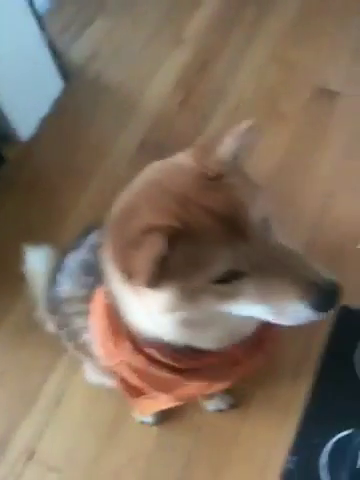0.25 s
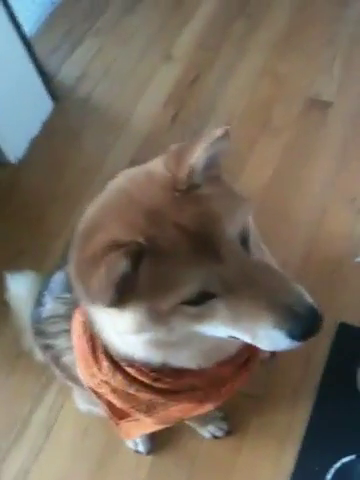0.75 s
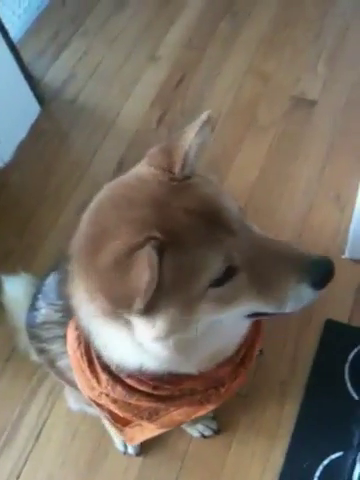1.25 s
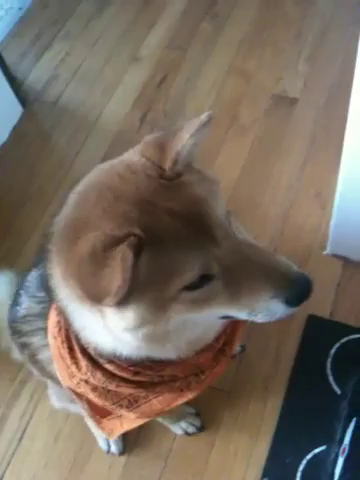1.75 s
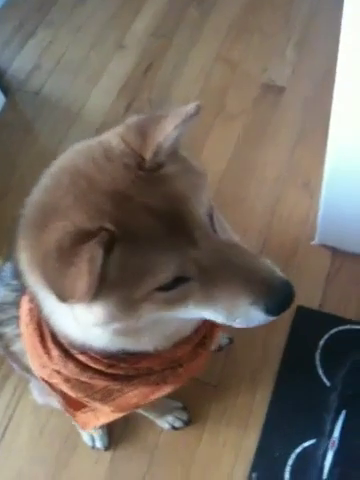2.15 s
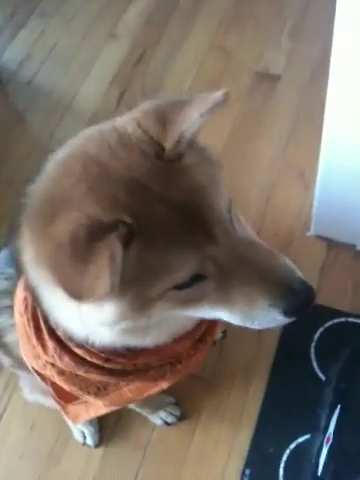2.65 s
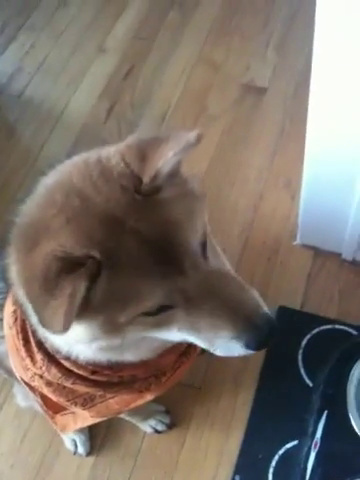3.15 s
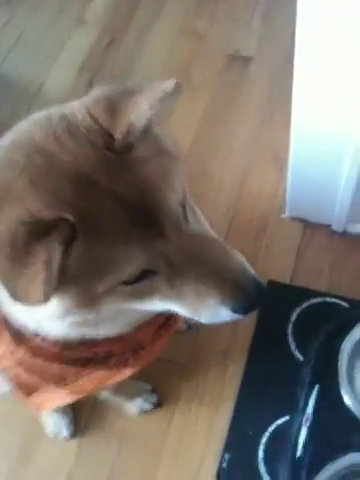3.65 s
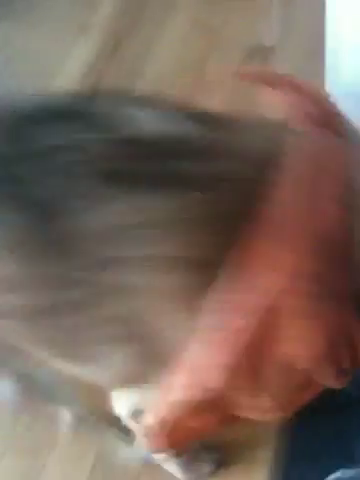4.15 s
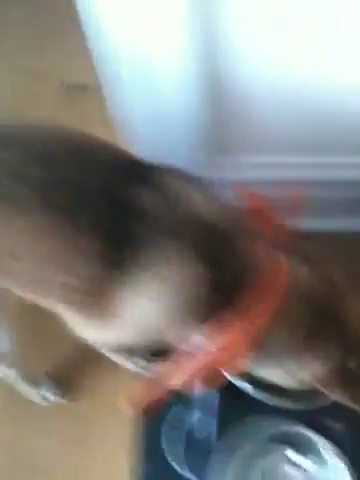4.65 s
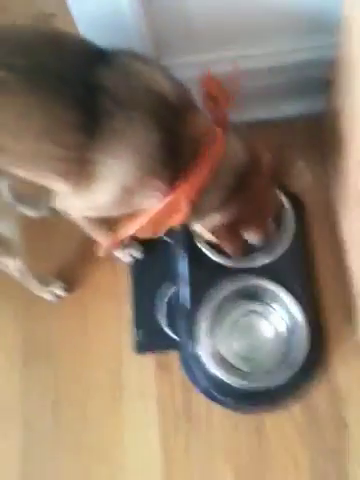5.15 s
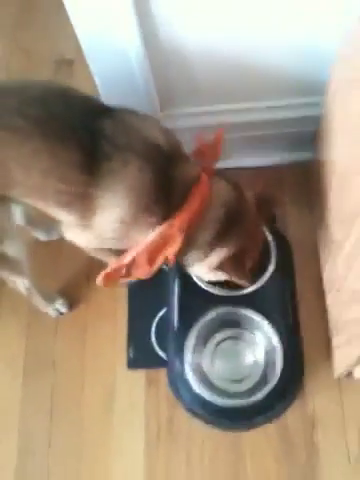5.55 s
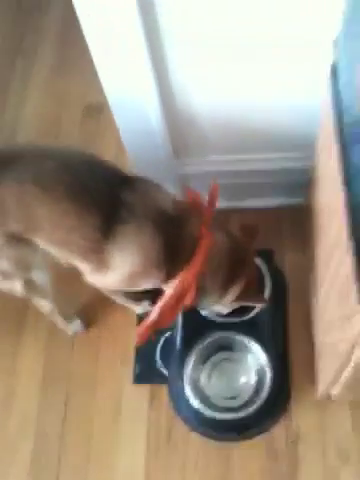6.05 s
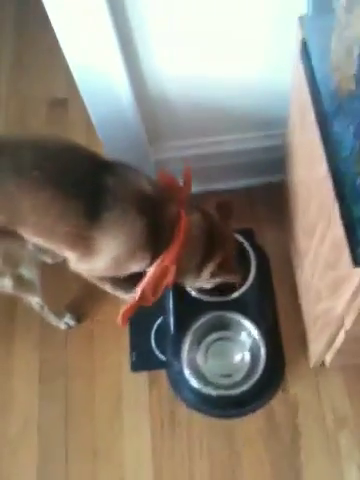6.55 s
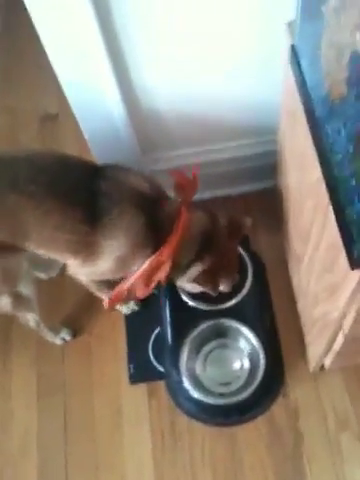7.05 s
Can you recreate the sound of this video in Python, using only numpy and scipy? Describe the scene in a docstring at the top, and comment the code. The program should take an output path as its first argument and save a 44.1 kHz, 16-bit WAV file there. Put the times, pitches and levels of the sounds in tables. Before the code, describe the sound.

Quiet kitchen hum with small wet lip smacks, a sudden loud clatter of dry food into metal, then busy crunching with pellet ticks.

```python
"""In a kitchen with a wooden floor a refrigerator hums while a dog waits, its lips clicking wetly.
Kibble slides out and crashes into a steel bowl, driving the phone into its limiter; then the dog eats.
Hum is mains harmonics over filtered noise; lick clicks are resonant bursts, thumps are damped low notes.
Kibble is random tiny impacts: coloured and ringing the bowl's modes as it lands, run together as
grinding when it shuffles, and dying away in short runs of cracks when it is bitten."""
import sys
import numpy as np
from scipy import signal
from scipy.fft import rfft, irfft
from scipy.io import wavfile
from scipy.ndimage import uniform_filter1d, minimum_filter1d

SR = 44100
rng = np.random.default_rng(int(sys.argv[2]) if len(sys.argv) > 2 else 0)


def to_wav(s):
    """Save 16-bit WAV."""
    ch = np.atleast_2d(s).T  # columns
    pcm = np.round(np.clip(ch, -1, 1) * 32767)  # PCM
    wavfile.write(sys.argv[1], SR, pcm.astype(np.int16))


N = 321489
TIME = np.arange(N) / SR  # s

# Colour of pellets hitting the bowl: (frequency [Hz], relative level [dB])
PELLET_COLOUR = [(88, -75), (150, -44.5), (267, -14.5), (545, -18), (630, -10.5), (833, -15.5), (940, -7.5),
                 (1090, -11), (1230, -13), (2550, -13.5), (5510, -0.5), (8580, 2.5), (9270, 2.5),
                 (13400, 2), (15000, -29.5)]
# Colour of crunching and grinding kibble: (frequency [Hz], relative level [dB])
CRUNCH_COLOUR = [(120, -59), (200, -2.5), (304, -8.5), (665, -6.5), (858, -5.5), (1210, -8.5), (1560, -7.5),
                 (1980, -8.5), (2170, -12), (2800, -7), (3750, -7.5), (6000, -5.5), (9400, -10.5),
                 (11300, -5), (12800, -10), (15500, -25.5)]
# Loud bites: (time [s], relative snap level [dB], relative body level [dB],
#              hollow of mouth and bowl [Hz], crumbling time [s])
LOUD_BITES = [(4.485, -36, -38.5, 1370, 0.0098), (4.496, -28.5, -33, 1670, .012),
              (4.6459, -45, -42, 2540, 0.0032), (4.687, -38, -40.5, 1900, .016),
              (4.7045, -33.5, -45, 1920, 0.036), (4.7798, -39, -49, 1100, 0.0049),
              (4.8137, -30.5, -41, 925, 0.0055), (4.831, -50, -45, 940, .007),
              (4.9036, -33.5, -45, 470, 0.0043), (4.9316, -26.5, -38.5, 1580, 0.0096),
              (4.9392, -25.5, -35.5, 750, 0.017), (5.0182, -30, -37, 1760, 0.013),
              (5.1377, -25, -37.5, 910, 0.021), (5.1578, -31, -37.5, 810, 0.013),
              (5.2595, -32.5, -42, 840, 0.032), (5.3376, -28, -32.5, 876, 0.012),
              (5.3516, -27, -32.5, 900, 0.01), (5.465, -31.5, -39.5, 1030, 0.0046),
              (5.478, -47, -45, 970, 0.0028), (5.547, -35.5, -48, 1010, 0.0072),
              (5.576, -47, -45, 1045, 0.0064), (5.6768, -33.5, -42.5, 1890, 0.0071),
              (5.7673, -35.5, -40, 555, 0.0088), (5.7909, -29.5, -39, 1020, 0.0047),
              (5.9247, -35.5, -37.5, 1080, 0.026), (6.037, -44, -39.5, 1490, 0.0083),
              (6.128, -31, -34.5, 1070, 0.033), (6.1512, -40, -42, 1280, 0.0087),
              (6.1845, -33, -42.5, 1310, 0.011), (6.226, -33.5, -37.5, 1340, 0.0052),
              (6.3236, -34, -42.5, 2900, 0.019), (6.3629, -39, -37, 1290, 0.0076),
              (6.3683, -24.5, -35.5, 1270, 0.0057), (6.4318, -39, -40, 450, 0.021),
              (6.4547, -31.5, -41, 570, .005), (6.5585, -32, -43, 1300, 0.0083),
              (6.6105, -38, -49, 600, 0.011), (6.648, -41, -46.5, 1300, .005),
              (6.796, -40.5, -45.5, 1450, 0.0069), (6.86, -31, -38, 608, 0.015),
              (6.993, -36, -41.5, 664, 0.015), (7.0123, -33, -37, 530, 0.049),
              (7.0836, -32.5, -36, 555, .012), (7.0952, -28, -35.5, 1900, 0.0087),
              (7.142, -48, -46, 1400, .012), (7.2096, -33, -40, 1390, 0.012)]

LANDING_S = 4.1039  # the portion reaches the bowl
ROOTING_S = 4.42  # the muzzle starts to root about in the food


def amp(db):
    """Decibels to gain."""
    return 10 ** (np.asarray(db) / 20)


def level(x, db):
    """Set the rms level."""
    return x * amp(db) / np.sqrt(np.mean(x ** 2))


def unit(x):
    """Scale to unit energy."""
    return x / np.sqrt(np.sum(x ** 2))


def add(out, s, sound):
    """Mix a sound in at a time in seconds."""
    start = int(s * SR)
    out[start:start + len(sound)] += sound[:N - start]


def through(x, response):
    """Convolve with an impulse response."""
    return signal.fftconvolve(x, response)[:len(x)]


def band(x, hz, kind, order=3):
    """Low-pass or high-pass."""
    return signal.sosfilt(signal.butter(order, min(hz, SR / 2 - 1), kind, fs=SR, output="sos"), x)


def resonance(x, hz, q):
    """One damped resonance, gain 1 at its centre."""
    return signal.lfilter(*signal.iirpeak(hz, q, fs=SR), x)


def spectrum_at(hz, points):
    """Read (Hz, dB) points on a log-frequency axis."""
    f, db = np.transpose(points)
    return np.interp(np.log(np.maximum(hz, 1)), np.log(f), db)


def colour(points, size=4096):
    """Causal, unit-energy impulse response shaped by (Hz, dB) points."""
    magnitude = amp(spectrum_at(np.fft.rfftfreq(size, 1 / SR), points))
    cepstrum = irfft(np.log(magnitude))
    # folding the cepstrum forward gives minimum phase
    cepstrum[1:size // 2] *= 2
    cepstrum[size // 2 + 1:] = 0
    return unit(irfft(np.exp(rfft(cepstrum))))


def hold_and_fall(t, db, hold_s, fall_db_per_s):
    """Gain that holds, then dies away."""
    return amp(db - fall_db_per_s * np.maximum(t - hold_s, 0))


def pushes(spread_db, per_s, size=1024):
    """Gain that glides between random levels, per_s of them each second."""
    return amp(spread_db * np.interp(TIME * per_s, np.arange(size), rng.standard_normal(size)))


def impacts(count, rate, scatter_db):
    """Randomly timed tiny impacts of uneven size and either sign, rate per second, rms 1."""
    chance, size, side = rng.random((3, count))
    struck = chance < rate / SR
    return level(struck * amp(scatter_db * size) * np.sign(side - .5), 0)


def burst(length, rate, count=4096):
    """A run of tiny fractures dying away with time constant length [s]; unit energy."""
    fade = np.exp(-np.arange(count) / SR / max(length, 1 / SR))
    return unit(impacts(count, rate, scatter_db=6.5) * fade)


def room(x, wet_db, t60=0.39, split_hz=3000, build=0.003):
    """Reflections from bare floor and walls: a noise tail whose bass and treble fade alike."""
    t, noise = TIME[:SR * 3 // 4], rng.standard_normal(SR * 3 // 4)
    reflections = band(noise, split_hz, "low") + band(noise, split_hz, "high")
    tail = reflections * np.exp(-np.log(1000) * t / t60)
    return x + amp(wet_db) * through(x, unit(tail * (1 - np.exp(-t / build))))


def air():
    """Steady rush of the room: coloured noise."""
    # (frequency [Hz], relative level [dB])
    air_colour = [(30, -29.8), (70, -21.9), (100, -12), (135, 0.0), (170, -3.9), (260, -1.1), (430, -6.3),
                  (750, -11.8), (1250, -13.3), (1480, -10), (1900, -13.8), (4000, -18), (11000, -21.5),
                  (13000, -26.5), (15500, -36)]
    return level(through(rng.standard_normal(N), colour(air_colour)), -60)


def refrigerator(mains_hz=60, uneven_db=2, waver_hz=1500, waver_per_s=1.6):
    """Strong mains harmonics swell and fade as the phone moves through standing waves, over a steady buzz."""
    # Compressor harmonics in the standing waves: (frequency [Hz], level at the first spot [dB],
    #                                              level at the second spot [dB], level above the bowl [dB])
    hum_harmonics = [(180, -65, -64, -73), (300, -66, -65, -64), (780, -76, -72.5, -81),
                     (900, -66, -70.5, -74), (960, -71, -68.5, -72), (1080, -71, -74, -68.5),
                     (1320, -67.5, -73, -70), (1440, -74.5, -69, -65), (1500, -71.5, -79, -73),
                     (1560, -64.5, -71, -66), (1680, -72, -72, -71.5), (1740, -81, -72.5, -74),
                     (1800, -73, -72.5, -75), (2400, -77, -79, -79), (2640, -75, -84, -78),
                     (3120, -78, -70, -71), (3240, -73, -71.5, -69.5), (3360, -74, -77.5, -78),
                     (3540, -79, -75, -75)]
    # Outline of the weaker harmonics: (frequency [Hz], mean level of each harmonic [dB])
    buzz_outline = [(120, -82), (240, -73), (360, -82), (460, -75), (560, -85), (1100, -82), (1500, -78),
                    (2100, -85), (2500, -81.5), (3500, -82), (4100, -89), (6650, -94), (6860, -79),
                    (7100, -92), (10000, -101)]
    # Where the phone is held: (time [s], place [0 first spot, 1 second spot, 2 above the bowl])
    phone_path = [(0, 0), (1.1, 0), (2.4, 1), (3.7, 1), (5.6, 2), (7.3, 2)]

    harmonics = np.arange(2, 166) * mains_hz
    comb = np.zeros(SR // 2 + 1, complex)  # one bin per hertz
    buzz_db = spectrum_at(harmonics, buzz_outline) + uneven_db * rng.standard_normal(len(harmonics))
    comb[harmonics] = amp(buzz_db) * np.exp(2j * np.pi * rng.random(len(harmonics)))

    hum, place = np.zeros(N), np.interp(TIME, *np.transpose(phone_path))
    for hz, *spots_db in hum_harmonics:
        comb[int(hz)] = 0  # a strong harmonic replaces the weak one
        # the hand sways: about 1 dB of waver at waver_hz, more at higher harmonics
        waver = pushes(spread_db=np.sqrt(hz / waver_hz), per_s=waver_per_s)
        swell = amp(np.interp(place, np.arange(len(spots_db)), spots_db)) * waver
        hum += np.sqrt(2) * swell * np.sin(2 * np.pi * (hz * TIME + rng.random()))
    buzz = np.resize(irfft(comb, SR) * SR / np.sqrt(2), N)  # one second, repeated seamlessly
    return hum + buzz


def licks(gain_db=20, q=1.3):
    """Films of saliva snap as the mouth opens: short bursts through a broad resonance."""
    # Wet clicks of lips and tongue: (time [s], relative level [dB], fading time [s], snap pitch [Hz])
    wet_clicks = [(0.146, -44, 0.0039, 9800), (1.183, -49.5, 0.0026, 12000), (1.274, -52, .007, 4300),
                  (1.93, -49.5, 0.019, 6900), (2.461, -45, 0.0081, 11500), (2.484, -55, 0.044, 11000),
                  (2.615, -52, .005, 11500), (2.978, -46, 0.006, 11000), (3.906, -42.5, 0.0038, 6900)]
    out = np.zeros(N)
    for s, db, length, hz in wet_clicks:
        add(out, s, amp(db + gain_db) * unit(resonance(burst(length, rate=4800), hz, q)))
    return out


def sliding(slide_s=3.847, rise_s=0.15, rise_db=23):
    """Gain of the portion sliding out: it gathers speed, then runs on until it lands."""
    speed = np.clip((TIME - slide_s) / rise_s, 0, 1)
    return amp(rise_db * (speed - 1)) * (TIME > slide_s) * (TIME < LANDING_S)


def stirring(stir_db=0.5, settle_s=0.019):
    """Gain of loose pellets under the muzzle: it jumps at each bite, more at a strong one, and settles."""
    usual_db, stir = np.mean(np.transpose(LOUD_BITES)[2]), np.zeros(N)
    for s, _, body_db, _, _ in LOUD_BITES:
        strength = amp(body_db - usual_db + stir_db) ** 2
        add(stir, s, strength * np.exp(-TIME[:SR // 2] / settle_s))
    return np.sqrt(1 + stir) * (TIME > ROOTING_S)


def shuffle(split_hz=2600, soft_hz=10500):
    """Loose pellets grind and tick together in uneven little pushes: first poured, then nosed about."""
    uneven = impacts(N, rate=1600, scatter_db=9.0) * pushes(spread_db=4.5, per_s=64)
    contacts = through(uneven, colour(CRUNCH_COLOUR))
    grind = level(band(contacts, split_hz, "low"), 0)
    # sliding is duller than cracking
    rustle = level(band(band(contacts, split_hz, "high"), soft_hz, "low", order=1), 0)
    poured = sliding() * (amp(-49.5) * grind + amp(-46.5) * rustle)
    nosed = stirring() * (amp(-58.5) * grind + amp(-63) * rustle)
    return poured + nosed


def thumps(gain_db=23.5, decay=0.0117, rise=0.0064, boards_db=0, boards_hz=400):
    """Soft blows on the boards: a damped low note in a dull rumble."""
    # Paws and the feeder bumping the floorboards: (time [s], relative level [dB], pitch [Hz])
    floor_blows = [(3.865, -44, 191), (3.959, -42, 325), (4.035, -40, 164), (4.223, -37, 166.4),
                   (4.362, -39, 254), (4.378, -41.5, 142), (4.903, -41, 303), (5.945, -40, 285),
                   (5.958, -42.5, 211), (6.549, -49, 221)]
    out, t = np.zeros(N), TIME[:SR // 5]
    envelope = np.exp(-t / decay) * (1 - np.exp(-t / rise))
    for s, db, hz in floor_blows:
        boards = band(band(rng.standard_normal(len(t)), boards_hz, "low"), 190, "high")
        blow = np.sin(2 * np.pi * hz * t) + level(boards, boards_db)
        add(out, s, amp(db + gain_db) * unit(blow * envelope))
    return out


def bowl_ring(damping=1, detune=.0008):
    """Steel modes struck at one random spot; shifting food detunes them, a muzzle on the steel damps them."""
    # Modes of the bowl: (frequency [Hz], undamped bandwidth [Hz], relative spectral peak [dB])
    bowl_modes = [(904, 12.4, -1.5), (946, 14, -4.5), (1233, 17, -5), (1347, 19, -6.5), (1660, 70, -9.5),
                  (1910, 80, -8), (4100, 34, -7.5), (5610, 70, -0.5), (6940, 25, -4.5), (8220, 20.2, 2.5),
                  (9330, 35, 9.5), (9350, 41, 5.5), (10270, 45, 1), (10770, 55, -3), (11030, 100, 3),
                  (12030, 50, 3.5)]
    t = TIME[:SR // 2]
    hz, width, db = np.transpose(bowl_modes)[:, :, None]
    hz = hz * (1 + detune * rng.standard_normal(hz.shape))
    phase = rng.uniform(0, 2 * np.pi, hz.shape)
    fade = np.exp(-np.pi * width * damping * t)
    modes = amp(db) * width * fade * np.sin(2 * np.pi * hz * t + phase)
    return unit(np.sum(modes, axis=0))


def ticks(gain_db=8, bounce_s=0.0045, ring_db=-9):
    """A pellet flicked against the wall of the bowl: one hard contact and a short ring."""
    # Single pellets against the steel: (time [s], relative level [dB])
    flicks = [(3.936, -41), (3.998, -33), (4.027, -31), (4.5755, -27.5), (4.8449, -39), (5.0444, -31),
              (5.0988, -32.5), (5.6445, -36.5), (5.894, -36), (5.9838, -38), (6.5455, -37.5),
              (6.7346, -41.5), (7.1915, -33), (7.2743, -40.5)]
    out = np.zeros(N)
    for s, db in flicks:
        hit = through(burst(bounce_s, rate=9600), colour(PELLET_COLOUR))
        ring = amp(ring_db) * through(hit, bowl_ring(damping=4))
        add(out, s, amp(db + gain_db) * unit(hit + ring))
    return out


def pour(ring_db=-1.5, split_hz=2800, bounce_s=0.007, lone_gain_db=23, clump_db=2.0, count=4):
    """Hundreds of pellets land in clumps and rebound on several spots of the bowl, then settle."""
    # Pellets that stand out, the last ones rattling to rest: (time [s], relative level [dB])
    lone_pellets = [(4.1053, -33), (4.161, -16), (4.2427, -21), (4.268, -25), (4.3006, -26.5), (4.333, -48)]
    t = TIME[:SR]
    clatter = hold_and_fall(t, db=-7.5, hold_s=0.032, fall_db_per_s=182)  # on the steel
    knock = hold_and_fall(t, db=-23, hold_s=0.075, fall_db_per_s=132.5)  # on the bowl's base
    tick, out = colour(PELLET_COLOUR), np.zeros(N)
    for spot in range(count):
        clumps = pushes(clump_db, per_s=88.7)[:SR]
        hits = impacts(SR, rate=900, scatter_db=7) * clumps / np.sqrt(count)
        steel = through(hits * clatter, unit(band(tick, split_hz, "high")))
        ring = amp(ring_db) * through(hits * clatter, bowl_ring())
        base = through(hits * knock, unit(band(tick, split_hz, "low")))
        add(out, LANDING_S, steel + ring + base)
    for s, db in lone_pellets:
        hit = burst(bounce_s, rate=3000)
        ring = amp(ring_db) * through(hit, bowl_ring())
        add(out, s, amp(db + lone_gain_db) * (through(hit, tick) + ring))
    return out


def nibbles(count=64, scatter_db=1, pitch_hz=1040, spread_oct=0.82, crumble_s=0.0021):
    """Crumbs crack at loose intervals all through the meal; rows have the columns of the loud bites."""
    late, (snap, body, pitch) = rng.random(count), rng.standard_normal((count, 3)).T
    s = ROOTING_S + (TIME[-1] - ROOTING_S) * (np.arange(count) + late) / count
    snap_db = -56 + scatter_db * snap
    body_db = -50.5 + scatter_db * body
    hollow_hz = pitch_hz * 2 ** (spread_oct * pitch)
    return list(zip(s, snap_db, body_db, hollow_hz, np.full(count, crumble_s)))


def eating(snap_gain_db=13, body_gain_db=20, ring_db=-17, split_hz=2800,
           variety_db=2.5, hollow_db=10, hollow_q=5.0):
    """Each pellet breaks in a run of cracks with a sharp snap and a hollow body; the bowl rings faintly."""
    snaps, bodies = np.zeros(N), np.zeros(N)
    knots = np.linspace(300, 15000, 24)  # Hz
    for s, snap_db, body_db, hollow_hz, length in list(LOUD_BITES) + nibbles():
        # no two pellets sound alike
        shape = colour(np.c_[knots, variety_db * rng.standard_normal(len(knots))])
        cracks = through(through(burst(length, rate=2600), shape), colour(CRUNCH_COLOUR))
        snap = band(cracks, split_hz, "high")
        body = band(cracks, split_hz, "low") + amp(hollow_db) * resonance(cracks, hollow_hz, hollow_q)
        add(snaps, s, amp(snap_db + snap_gain_db) * unit(snap))
        add(bodies, s, amp(body_db + body_gain_db) * unit(body))
    bites = snaps + bodies
    return bites + amp(ring_db) * through(bites, bowl_ring(damping=6))


def scene():
    """Everything as it reaches the phone above the dog: food, licks, refrigerator and air."""
    crash = room(pour(), wet_db=-12.0)
    meal = room(eating() + ticks() + shuffle() + thumps(), wet_db=-4.5)
    food = band(crash + meal, 125, "high")
    mouth = room(licks(), wet_db=-6.5)
    return (food + mouth + refrigerator() + air())[None]


def record(dry, size=4, ceiling=.76, top_hz=15700):
    """A limiter acting within a few samples flattens the crash; a steep filter cuts the top."""
    needed = ceiling / np.maximum(np.abs(dry), ceiling)
    gain = uniform_filter1d(minimum_filter1d(needed, 2 * size + 1), size)
    top_cut = signal.ellip(8, .1, 50, top_hz, fs=SR, output="sos")
    return signal.sosfiltfilt(top_cut, dry * gain)


dry = scene()
out = record(dry)
to_wav(out)
```